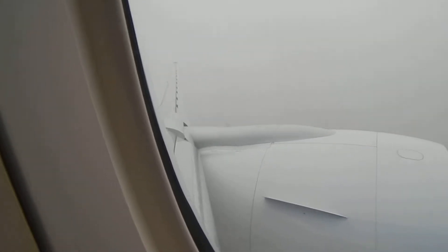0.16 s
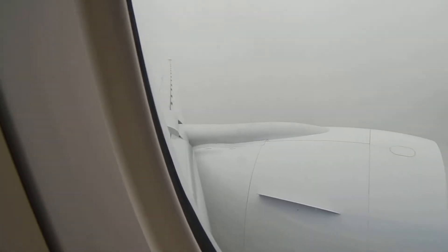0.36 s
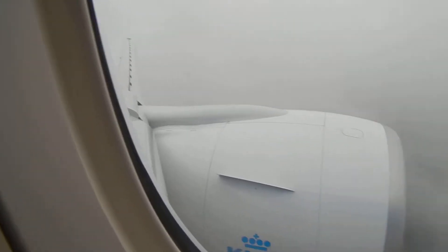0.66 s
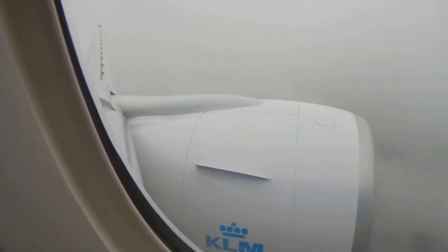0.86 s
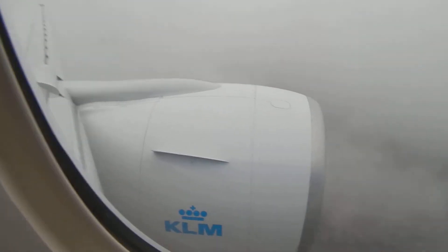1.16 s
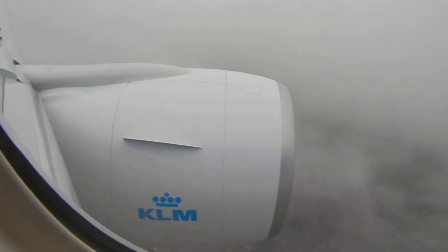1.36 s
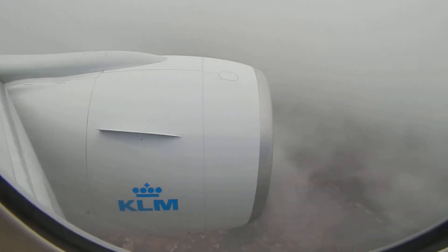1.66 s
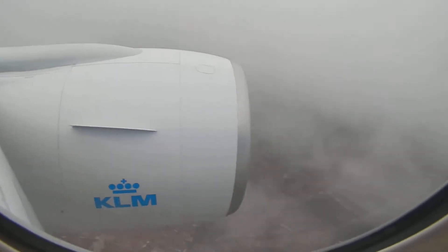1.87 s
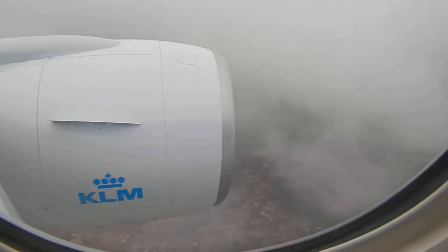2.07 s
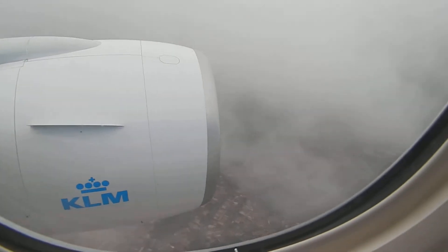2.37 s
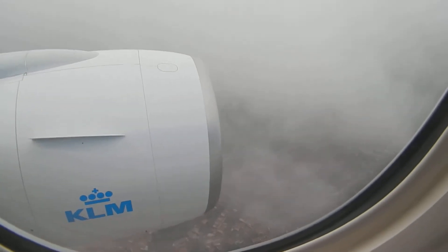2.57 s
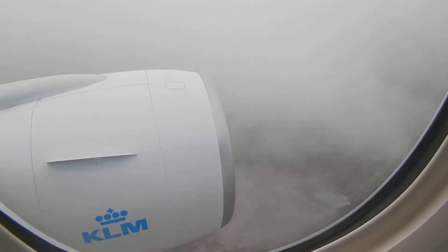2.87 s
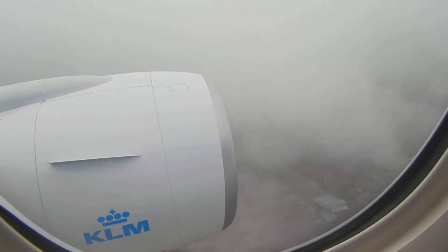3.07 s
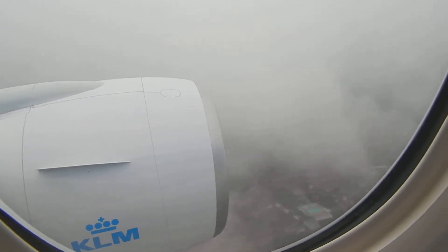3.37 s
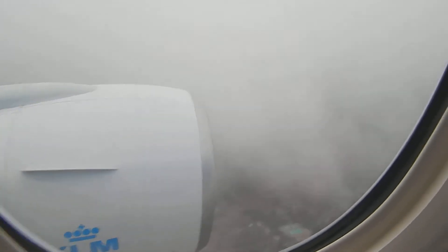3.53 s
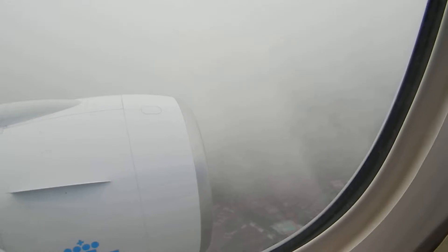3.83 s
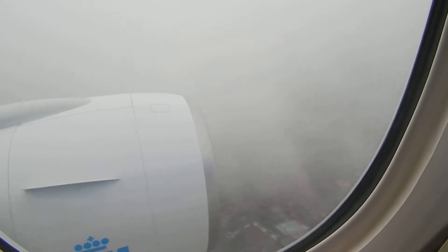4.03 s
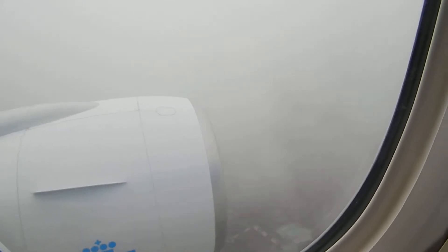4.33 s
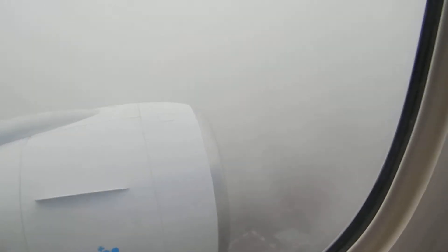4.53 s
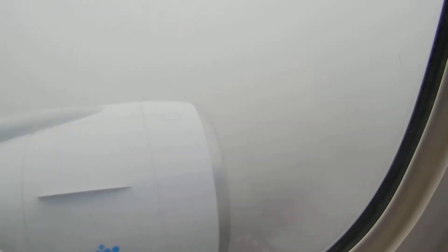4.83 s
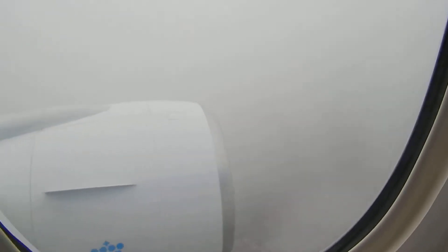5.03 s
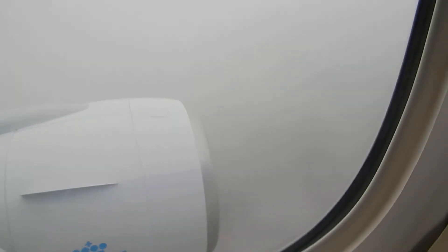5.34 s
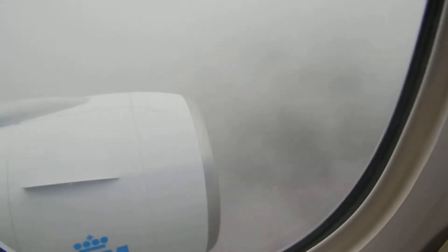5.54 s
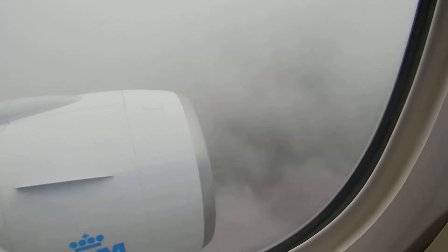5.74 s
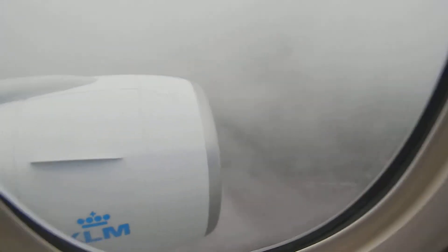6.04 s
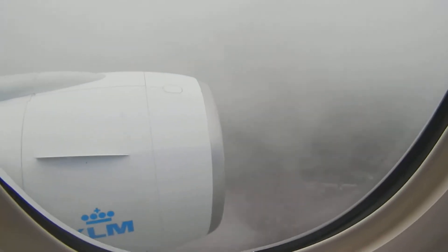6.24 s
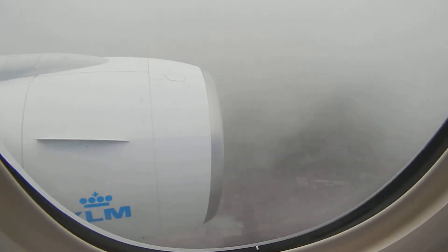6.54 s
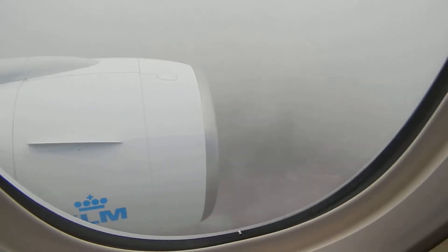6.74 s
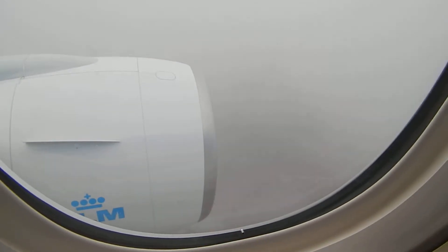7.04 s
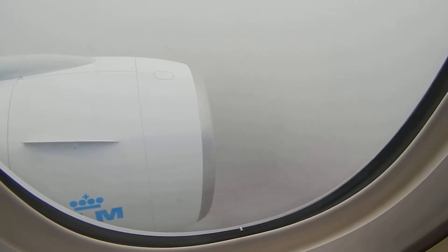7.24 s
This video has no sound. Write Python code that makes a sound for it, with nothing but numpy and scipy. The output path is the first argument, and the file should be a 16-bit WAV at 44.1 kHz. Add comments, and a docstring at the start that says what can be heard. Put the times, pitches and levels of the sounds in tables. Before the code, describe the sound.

A heavy, low jet engine drone fills a passenger cabin from start to finish, with the microphone at a seat near the wing. Air rushes more softly along the wall, over a faint hiss and thin whine. Short, dry clicks come unevenly a few times a second, making the roar sag slightly and recover. Barely audible clothing swishes and trim creaks come and go, mostly in the second half.

```python
"""Airliner cabin by the wing

Engine roar excites the cabin's low modes, and the turbulent boundary layer rushes along the wall.
Vents hiss over blurred fan tones and a faint electrical whine; cloth rustles, seat and trim creak.
A few times a second a dry tick sounds as the whole level drops, then creeps back up."""
import sys
import numpy as np
from scipy import signal
from scipy.fft import rfft, irfft, next_fast_len
from scipy.io import wavfile
from scipy.ndimage import uniform_filter1d, minimum_filter1d

SR = 44100
rng = np.random.default_rng(int(sys.argv[2]) if len(sys.argv) > 2 else 0)


def transcribe(u):
    """Save the signal u as a 16-bit wav file named by the first command-line argument.

    u: samples, shape (n,) or (channels, n), limited to [-1, 1]; the rate is SR.
    q: integer samples, one column per channel.
    """
    v = np.clip(np.atleast_2d(u).T, -1, 1)
    q = np.round(v * 32767).astype(np.int16)
    wavfile.write(sys.argv[1], SR, q)


N = 326340
T = np.arange(N) / SR
FFT_SIZE = next_fast_len(N)
HZ = np.maximum(np.arange(FFT_SIZE // 2 + 1) * SR / FFT_SIZE, 1)

# likeness of left and right: (frequency [Hz], correlation [ratio])
CORRELATION = [(30, .98), (60, .993), (200, .993), (400, .97), (700, .88), (1200, .63), (2000, .45),
               (3200, .2), (5000, -.05), (15000, .03)]
# stereo balance: (frequency [Hz], left minus right [dB])
BALANCE = [(60, 0.5), (130, -0.5), (290, -0.5), (640, 1.5), (1410, -1), (3100, -0.5), (6820, 0.5),
           (15000, 2)]
# slow swell: (time [s], boom level [dB], hiss level [dB], boom left minus right [dB])
CABIN_SWELL = [(0, -11, -66, -0.2), (.55, -11, -65, 0.3), (1.6, -10.5, -64, 0), (1.95, -12.5, -65.5, 0.5),
               (2.249, -11.5, -65.5, 0.5), (2.7, -12, -62.5, 0.8), (3.651, -12, -63, 0.2),
               (4.1, -11.5, -63.5, 1), (4.7, -12.5, -61.5, .5), (5.5, -12, -62.5, .5),
               (5.95, -12, -63, 0.7), (6.4, -12, -64.5, 1), (7.4, -12.5, -64, 0)]
# cabin and panel modes: (frequency [Hz], nominal width [Hz], start weight [dB], end weight [dB])
CABIN_MODES = [(78.7, 35, -10, -8), (112, 25, 0.5, -0.5), (139.7, 25, -3.5, -5), (153.6, 22.3, -3.5, -4),
               (201, 20, -7.5, -8.5), (322, 15, -17, -15), (313, 21, -22, -22), (354.3, 30, -21, -19),
               (383.8, 18, -15, -13.5), (410.6, 20, -15, -16.5), (435.8, 18, -13, -19.5),
               (446.7, 14, -14.5, -16), (492.5, 22, -29, -23)]
# boundary-layer spectrum: (frequency [Hz], relative level [dB])
WALL_SPECTRUM = [(260, -33.5), (450, -9), (520, -12), (560, -11), (1490, -29), (1650, -29), (1810, -31.5),
                 (2100, -31), (2460, -34), (2760, -34.5), (7000, -55), (9100, -88.5), (15400, -120)]
# trim panel resonances: (frequency [Hz], width [Hz], boost [dB])
TRIM_MODES = [(750, 160, 3), (1280, 46, 2.5), (1665, 30, 5), (1960, 120, 1), (2630, 200, 1),
              (3520, 420, 3.5), (4150, 300, 2.5)]
# vent hiss spectrum: (frequency [Hz], relative level [dB])
VENT_SPECTRUM = [(2940, -23.5), (5000, -9), (7340, -10), (9380, -7.5), (11400, -8.5), (14900, -22),
                 (15300, -26), (15500, -37.5)]
# electrical whine: (harmonic [number], level [dB])
WHINE_HARMONICS = [(21, -89), (23, -89), (24, -86), (25, -91), (26, -84), (27, -88), (28, -91), (29, -92),
                   (30, -100)]
# fan tones: (frequency [Hz], width per stage [Hz], start level [dB], end level [dB])
FAN_BANDS = [(1394, 30, -52.5, -66), (1664, 24, -56.5, -61), (2100, 120, -62.5, -56.5),
             (2858, 20, -70, -68)]
# fan rotation: (time [s], relative speed [ratio])
FAN_SPEED_CURVE = [(0, 1), (2, 1), (4, 1.002), (5.6, .995), (6.8, 1.006), (7.4, 1.002)]
# cloth swishes: (time [s], level [dB], fade [s], left minus right [dB])
CLOTH_SWISHES = [(0.256, -51, 0.007, -1), (.437, -59, .01, 1), (.577, -57, .012, -0.5),
                 (1.481, -57, .008, 1), (2.709, -57, .008, 4), (1.291, -56, 0.022, -2),
                 (2.755, -60, .045, -1), (3.268, -56.5, 0.036, 1), (4.289, -50, 0.012, 3),
                 (4.39, -63, 0.06, 5), (4.46, -59.5, 0.22, 5), (4.793, -52, 0.018, 5),
                 (4.818, -51, 0.027, 6), (4.856, -50, 0.033, 2), (5.17, -60.5, 0.11, 5),
                 (5.22, -58, .04, 5), (5.46, -56, 0.071, 1), (5.524, -52, .005, 3), (5.678, -60, .07, 2),
                 (5.868, -52.5, 0.028, 8), (5.916, -58.5, .09, 2), (6.373, -60, 0.037, -2),
                 (6.576, -57, .015, -1), (6.617, -61, 0.14, -2), (7.37, -57, 0.066, 3)]
# ticks: (time [s], gain the scene falls to [dB], kick level [dB], added snap [dB])
TICK_EVENTS = [(0.2621, -2.5, -7.5, 2.5), (0.5705, -1.5, -7.5, 2), (0.784, -3, -5.5, 1),
               (1.0345, -2, -5, -1), (1.1723, -2.5, -6, 2), (1.4182, -1.5, -6, 1.5),
               (1.6311, -3.5, -5.5, 0.5), (1.891, -2.5, -5.5, 0), (2.084, -1, -11, -1),
               (2.197, -0.5, -6.5, -18), (2.362, -1, -7, 1), (2.5917, -1.3, -5.5, 0),
               (2.8111, -0.5, -3.5, -2), (2.969, -2.5, -8, -2), (3.387, -1.5, -4.5, -3),
               (3.5619, -3, -4.5, -1), (3.8614, -2.5, -7, -5), (4.128, -5.5, -6.5, 1),
               (4.5376, -2, -7, 3.5), (4.846, -3, -6, -3), (5.2318, -1, -11, 7), (5.5055, -0.1, -6.5, -9),
               (5.7233, 2.5, -5, -3), (5.746, -2, -19, -5), (6.0333, 0, -5.5, 1), (6.1456, 0, -7.5, 1.5),
               (6.246, -3.5, -4.5, -3), (6.6253, -0.5, -4.5, -7), (6.903, 1, -6, -3), (6.985, -2, -5.5, 0),
               (7.3398, 0.8, -5, -5)]
# seat and trim creaks: (time [s], level [dB], length [s], frequency [Hz], width per stage [Hz])
TRIM_CREAKS = [(0.535, -52.5, 0.044, 3600, 130), (3.267, -45, .05, 1910, 300), (3.3, -50, 0.023, 1900, 300),
               (3.331, -50, .02, 2300, 300), (3.354, -46.5, 0.022, 2000, 200),
               (4.796, -54, 0.018, 5930, 900), (4.798, -55, .03, 4400, 700),
               (5.885, -54.5, 0.05, 3900, 1500)]
# narrow dips in the treble: (frequency [Hz], width [Hz], depth [0-1])
TREBLE_NOTCHES = [(2500, 90, .85), (7500, 130, .8)]

PAN = np.array([[.5], [-.5]])   # splits a level difference between left and right


def amp(db):
    """Amplitude ratio of a level in decibels."""
    return 10 ** (np.asarray(db) / 20)


def spectrum(points):
    """Interpolation of a table on a log-frequency axis."""
    hz, value = np.transpose(points)
    return np.interp(np.log(HZ), np.log(hz), value)


def resonance(hz, width):
    """Magnitude response of a damped oscillator, 1 at its peak."""
    return 1 / np.sqrt(1 + ((HZ ** 2 - hz ** 2) / (HZ * width)) ** 2)


def drift(corner_hz):
    """Low-passed noise: a slow random fluctuation of unit deviation."""
    hop, settle = 40, 2000
    pole = np.exp(-2 * np.pi * corner_hz * hop / SR)
    white = rng.standard_normal(N // hop + settle + 2)
    slow = signal.lfilter([1], [1, -2 * pole, pole ** 2], white)[settle:]
    return np.interp(np.arange(N) / hop, np.arange(len(slow)), slow / slow.std())


def impulses(per_s):
    """Shot noise: impulses of random size at random times."""
    return rng.standard_normal(N) * (rng.random(N) < per_s / SR)


def stereo_noise(shape):
    """Partially coherent noise, alike in the bass and unrelated in the treble; mid rms 1."""
    mid, side = rfft(rng.standard_normal((2, FFT_SIZE))) * shape
    alike, lean = spectrum(CORRELATION), amp(spectrum(BALANCE) / 2)
    mid, side = np.sqrt(1 + alike) * mid, np.sqrt(1 - alike) * side
    pair = irfft([(mid + side) * lean, (mid - side) / lean], FFT_SIZE)[:, :N]
    return pair / pair.mean(0).std()


def engine_boom(level_db, surge_db=3, surge_s=.0029):
    """Forced resonance: roar drives cabin modes whose balance shifts slowly; it surges at each tick."""
    # each resonance acts twice, keeping the valleys dark
    power = sum(amp(weights_db)[:, None] ** 2 * resonance(hz, 1.47 * width) ** 4
                for hz, width, *weights_db in CABIN_MODES)
    early, late = map(stereo_noise, np.sqrt(power))
    roar = np.sqrt(1 - T / T[-1]) * early + np.sqrt(T / T[-1]) * late
    surge = sum(np.exp(-.5 * ((T - s) / surge_s) ** 2) for s, *_ in TICK_EVENTS)
    return amp(level_db + surge_db * surge) * roar


def wall_rush(level_db):
    """Transmission of boundary-layer turbulence through the wall, lifted where trim panels resonate."""
    lift_db = sum(db * resonance(hz, width) ** 2 for hz, width, db in TRIM_MODES)
    return amp(level_db + .6 * drift(8)) * stereo_noise(amp(spectrum(WALL_SPECTRUM) + lift_db))


def vent_hiss(level_db):
    """Broadband flow noise from the air vents, bright and slightly fluttering."""
    return amp(level_db + .71 * drift(7.4)) * stereo_noise(amp(spectrum(VENT_SPECTRUM)))


def electrical_whine(pulse_hz=510.52):
    """High harmonics of one electrical pulse rate form thin, steady lines."""
    return sum(np.sqrt(2) * amp(db) * np.sin(2 * np.pi * (k * pulse_hz * T + rng.random()))
               for k, db in WHINE_HARMONICS)


def fan_tones():
    """Spectral broadening: air blurs the tones into noise bands whose pitch follows the fan's speed."""
    warped_s = np.cumsum(np.interp(T, *np.transpose(FAN_SPEED_CURVE))) / SR
    bands = sum(amp(np.linspace(start_db, end_db, N)) * stereo_noise(resonance(hz, width) ** 2)
                for hz, width, start_db, end_db in FAN_BANDS)
    return np.array([np.interp(warped_s, T, channel) for channel in bands])


def cloth_rustles(band_hz=(7460, 14200), rise_share=.7):
    """Friction of cloth: swishes of noise with crackling grains, quicker to come than to go."""
    grains = impulses(per_s=900)
    rubbing = rng.standard_normal((2, N)) * amp(1.3 * drift(150))
    bandpass = signal.butter(3, band_hz, "band", fs=SR, output="sos")
    band = signal.sosfilt(bandpass, rubbing + amp(-6.5) * grains / grains.std())
    envelope = np.zeros((2, N))
    for s, db, fade_s, pan_db in CLOTH_SWISHES:
        offset = 3 * (T - s) / np.where(T < s, rise_share * fade_s, fade_s)
        envelope += amp(db + pan_db * PAN) / np.cosh(np.clip(offset, -50, 50))
    return envelope * band / band.std()


def ticks(x, rise_s=.00013, fade_s=.00074, crossover_hz=3360, edge_hz=12000):
    """Impulse response: each tick kicks the wave x further out with a fast-decaying pulse."""
    tick_s, _, kick_db, snap_db = np.transpose(TICK_EVENTS)
    at, kicks = (tick_s * SR).astype(int), np.zeros((2, N))
    kicks[:, at] = np.sign(x[0, at]) * amp([kick_db, kick_db - 4 + snap_db])
    # a weaker, uneven second kick follows within about 1.2 ms
    share, wait = rng.random((len(at), 2)).T
    kicks[:, at + 1 + (wait * .0012 * SR).astype(int)] = .3 * (2 * share - 1) * kicks[:, at]
    t = np.arange(SR // 50) / SR
    pulse = np.exp(-t / fade_s) - np.exp(-t / rise_s)
    body, snap = signal.fftconvolve(kicks, [pulse], axes=1)[:, :N]
    dull_body, dull_snap = signal.lfilter(*signal.butter(2, crossover_hz, fs=SR), [body, snap])
    edge = amp(-1.5) * signal.lfilter(*signal.butter(2, edge_hz, "high", fs=SR), snap)
    return dull_body + snap - dull_snap + edge


def level_sag(x, start_db=-4.5, creep_db_per_s=19.5, drop_s=.00094):
    """Sawtooth amplitude modulation: the level creeps up steadily and falls at each tick."""
    tick_s, low_db, *_ = np.transpose(TICK_EVENTS)
    ramp_s, low_db = np.append(0, tick_s), np.append(start_db, low_db)
    last = np.searchsorted(ramp_s, T, "right") - 1
    sawtooth_db = low_db[last] + creep_db_per_s * (T - ramp_s[last])
    pole = np.exp(-1 / (drop_s * SR))
    return x * amp(start_db + signal.lfilter([1 - pole], [1, -pole], sawtooth_db - start_db))


def creaks():
    """Stick-slip friction: dense, uneven slips in seat and trim ring one steep resonance per creak."""
    sound, slips = np.zeros(N), impulses(per_s=6000)
    for s, db, length, hz, width in TRIM_CREAKS:
        peak = signal.iirpeak(hz, hz / width, fs=SR)
        ring = signal.lfilter(*peak, signal.lfilter(*peak, slips))
        sound += amp(db) * ring / ring.std() * np.exp(-4 * ((T - s) / length) ** 2)
    return sound


def limiter(x, threshold_db=-4.5, squeeze=.6, window_s=.006):
    """Peak compression: gain eases down around the tallest swings by a share of their excess."""
    size = int(window_s * SR)
    over_db = np.maximum(20 * np.log10(np.abs(x).max(0) + 1e-9) - threshold_db, 0)
    held_db = -minimum_filter1d(-over_db, size)
    smooth_db = uniform_filter1d(uniform_filter1d(held_db, size), size)
    return x * amp(-squeeze * smooth_db)


def scene():
    """Superposition of the cabin's sources at the seat."""
    s, *levels = np.transpose(CABIN_SWELL)
    boom_db, hiss_db, pan_db = [np.interp(T, s, column) for column in levels]
    return (engine_boom(boom_db + pan_db * PAN) + wall_rush(level_db=-35) + electrical_whine()
            + vent_hiss(hiss_db) + fan_tones() + cloth_rustles() + creaks())


def record(dry):
    """Modulation and compression, added ticks, then filtering by two notches and a steep low-pass."""
    x = limiter(level_sag(dry)) + ticks(dry)
    for hz, width, depth in TREBLE_NOTCHES:
        x = x - depth * signal.lfilter(*signal.iirpeak(hz, hz / width, fs=SR), x)
    return signal.sosfilt(signal.ellip(10, .5, 60, 15700, fs=SR, output="sos"), x)


dry = scene()
out = record(dry)
transcribe(out)
```